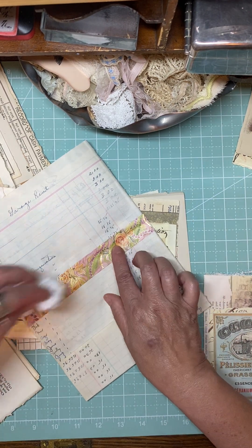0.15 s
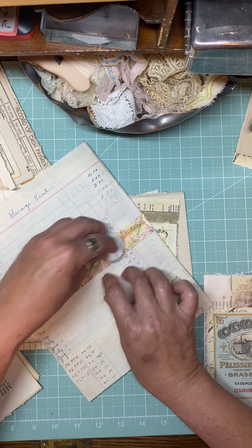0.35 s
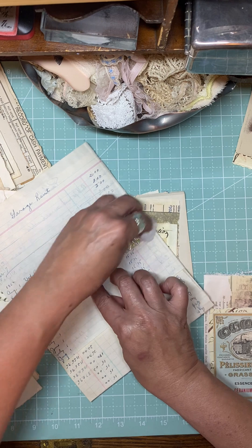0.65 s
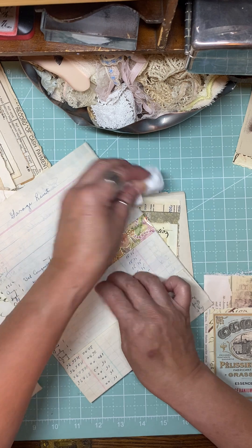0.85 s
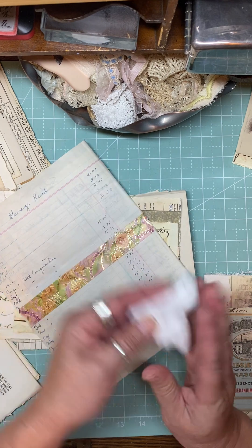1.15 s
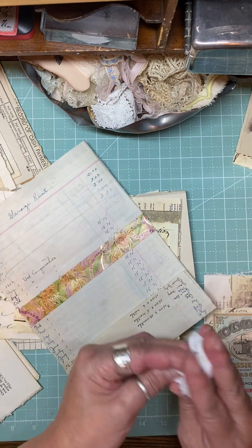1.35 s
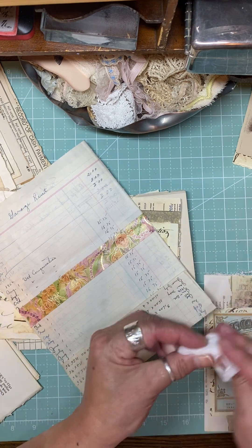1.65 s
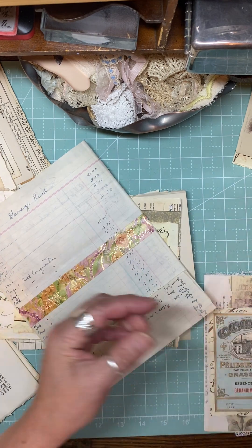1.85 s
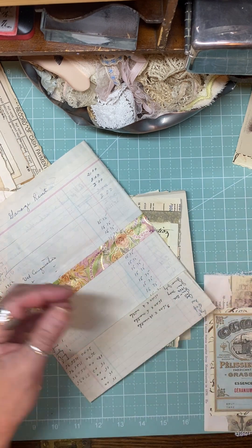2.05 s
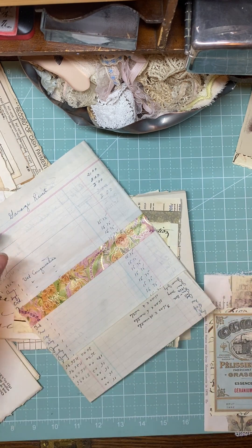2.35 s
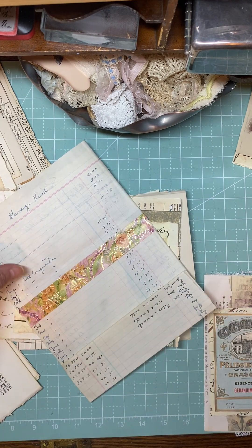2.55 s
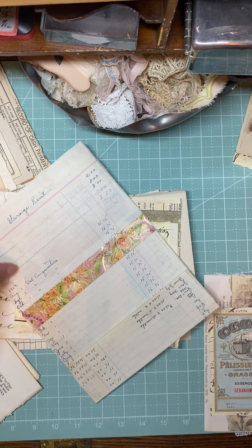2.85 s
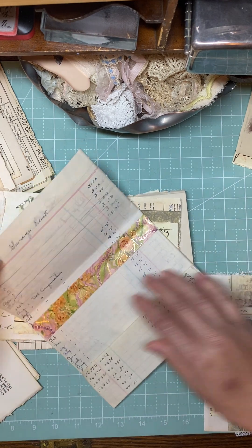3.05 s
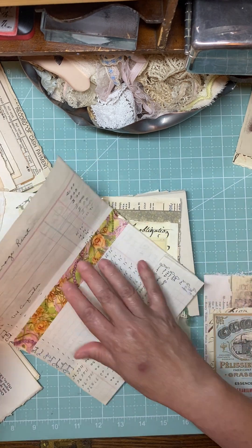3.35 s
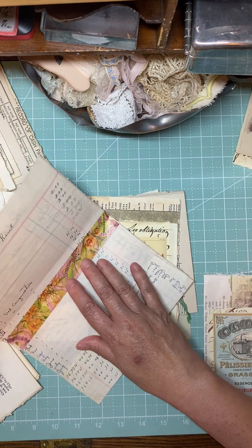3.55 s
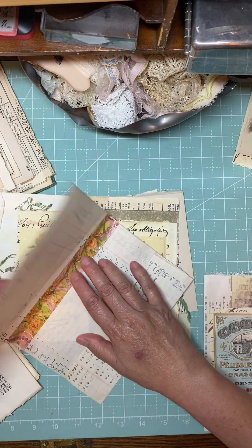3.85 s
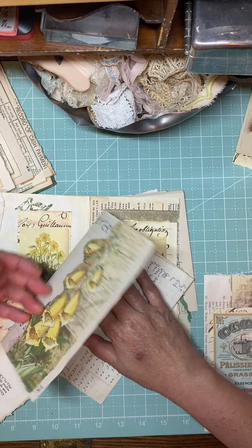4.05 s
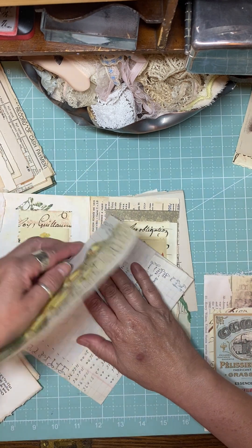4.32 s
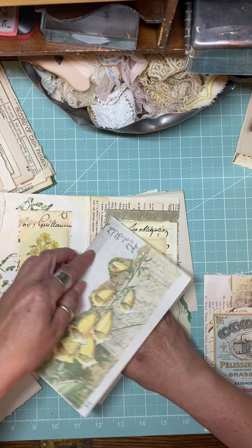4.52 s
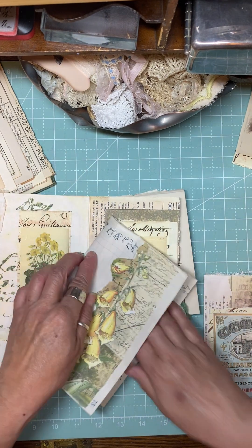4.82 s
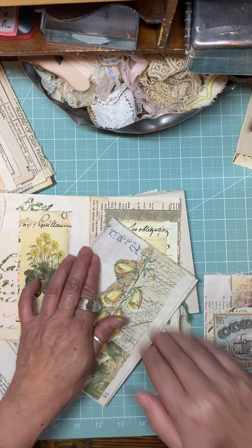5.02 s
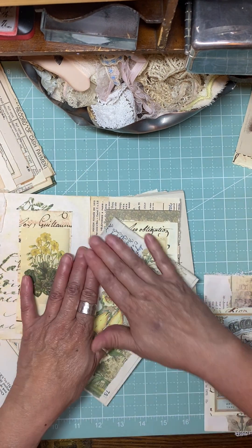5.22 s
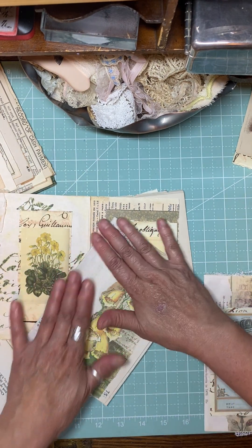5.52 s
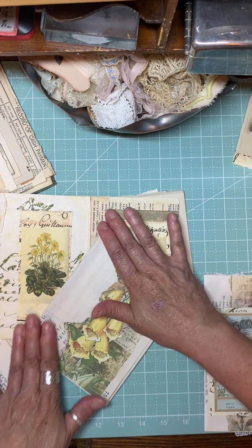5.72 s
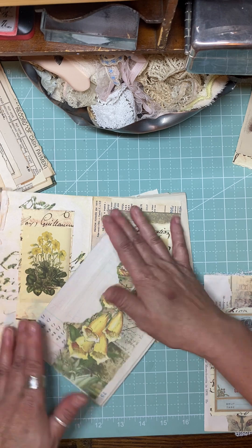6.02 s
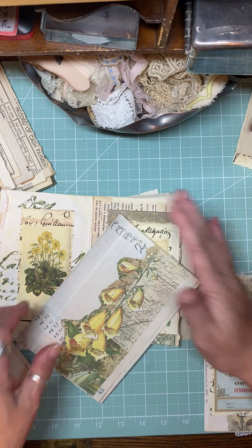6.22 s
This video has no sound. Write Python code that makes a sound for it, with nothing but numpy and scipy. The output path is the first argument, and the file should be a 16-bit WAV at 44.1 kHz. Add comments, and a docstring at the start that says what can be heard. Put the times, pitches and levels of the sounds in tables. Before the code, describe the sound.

Fingers and cloth rub paper in soft raspy strokes, then a sheet is folded over with two loud crisp snaps and smoothed, over a low machine hum.

```python
"""Hands wipe, lift, fold and press sheets of paper on a desk mat, close under a phone with two microphone ports.
Strokes are grainy friction noise, and the loose sheet flaps as duller noise.
Creases and fingertip taps are kicks and crackles that ring sheet and desk; soft contacts and rustles are
noisy pushes, low to bright, that swell and die. Behind them a machine hums: noise in narrow modes of the
small room and two wavering tones, with a broad low rumble of room air that thins out into faint hiss."""
import sys
import numpy as np
from scipy import signal
from scipy.fft import rfft, irfft, next_fast_len
from scipy.io import wavfile
from scipy.ndimage import uniform_filter1d, map_coordinates

SR = 44100
rng = np.random.default_rng(int(sys.argv[2]) if len(sys.argv) > 2 else 0)


def materialize(psi):
    """Save the field psi as 16-bit PCM at rate SR to the path in sys.argv[1].

    A 1-D psi becomes a single channel; in a 2-D psi each row is a channel.
    """
    bounded = np.clip(np.atleast_2d(psi).T, -1, 1)
    quanta = np.round(bounded * 32767).astype(np.int16)
    wavfile.write(sys.argv[1], SR, quanta)


def natural_amplitude(level_db):
    """Convert a level in decibels to a linear amplitude factor, elementwise."""
    exponent = np.asarray(level_db, float) / 20
    return 10 ** exponent


N = 281358  # samples


def unit(x):
    """Scales a signal to rms 1."""
    return x / np.sqrt(np.mean(x ** 2) + 1e-20)


def along(points, hz):
    """Reads a curve of (Hz, value) points on a log frequency axis."""
    f, v = np.transpose(points)
    return np.interp(np.log(hz + 1), np.log(f + 1), v)


def filtered(x, response):
    """Multiplies the spectrum of x by a complex response of frequency."""
    n = x.shape[-1]
    m = next_fast_len(n + 8192)  # room for the ringing
    return irfft(rfft(x, m) * response(np.fft.rfftfreq(m, 1 / SR)), m)[..., :n]


def coloured(x, spectrum):
    """Shapes x by (Hz, dB) points, at rms 1."""
    return unit(filtered(x, lambda hz: natural_amplitude(along(spectrum, hz))))


def modes(table):
    """Causal response of (Hz, width Hz, dB) resonances, added with alternating sign."""
    def response(f):
        total = 0
        for k, (centre, width, db) in enumerate(table):
            damping = 1j * f * width
            total = total + (-1) ** k * natural_amplitude(db) * damping / (centre * centre - f * f + damping)
        return total
    return response


def wobble(rate):
    """A smooth random curve with rate knots a second."""
    return map_coordinates(rng.standard_normal(N // 20), [np.arange(N) * rate / SR])


def grainy(clump_db, patch_db, tick_db, density):
    """Friction noise: clumps of catching fibres, patches of colour, and density small ticks a second."""
    hiss = rng.standard_normal(N) * natural_amplitude(clump_db * (wobble(35) + wobble(220)))
    ticks = (rng.random(N) < density / SR) * rng.laplace(size=N)
    z = signal.stft(unit(hiss) + natural_amplitude(tick_db) * ticks, nperseg=256)[2]
    across_pitch = uniform_filter1d(rng.standard_normal(z.shape), size=3, axis=0)
    patches = unit(uniform_filter1d(across_pitch, size=10, axis=1))
    return signal.istft(z * natural_amplitude(patch_db * patches), nperseg=256)[1][:N]


def touch(rows):
    """Gain of each (s, dB, build-up s, let-go s) row over time, one line a row, at every 32nd sample."""
    s, db, rise, fall = np.transpose(rows)[:4, :, None]
    t = np.arange(0, N + 32, 32) / SR - s
    # share of the build-up or let-go away from the firmest touch
    u = np.clip(np.where(t < 0, -t / np.abs(rise), t / np.abs(fall)), 0, 1)
    return natural_amplitude(db) * (1 - u ** 1.067) ** 1.554


def together(gains):
    """Adds the rows in power and gives one value per sample."""
    total = np.sqrt((gains ** 2).sum(axis=0))
    return np.interp(np.arange(N) / 32, np.arange(gains.shape[1]), total)


def diffuse(two):
    """Turns two unrelated signals into sound from all sides, as alike at the two ports as the table says."""
    # left-right likeness at the two ports: pitch_hz, likeness (1 same, -1 opposite)
    likeness = [(60, .997), (100, .995), (160, .965), (290, .75), (640, 0), (1500, .4), (4000, .2),
                (7000, .2), (10000, -.4), (12500, -.9), (14000, -.98)]

    def mid_side(hz):
        turn = np.arccos(along(likeness, hz)) / 2
        return np.array([np.cos(turn), np.sin(turn)])

    mid, side = filtered(two, mid_side)
    return np.array([mid + side, mid - side])


def strokes():
    """Skin and cloth slide on paper: a rub, a fine hiss from the same fibres, small creases, and the flapping sheet."""
    # slides over the paper: firmest_touch_s, rub_db, build_up_s, let_go_s, fine_hiss_over_rub_db
    slides = [ (0.0, -64, .05, 0.14, 2.5), (.073, -63.5, 0.02, 0.074, 2), (.155, -72.5, 0.059, 0.2, -2),
              (0.242, -63.5, 0.013, 0.017, -24), (.35, -67, 0.15, 0.076, 0.5), (.4, -62, 0.13, 0.047, 4),
              (.445, -63, 0.064, 0.16, 3), (.535, -63.5, 0.13, .03, 3.5), (.572, -58, 0.042, 0.12, 3),
              (.64, -66, 0.12, 0.096, 8.5), (.69, -62, 0.031, 0.21, 6.5), (.785, -61, 0.23, 0.079, 5.5),
              (.85, -61, .04, 0.041, 2), (.898, -73, 0.021, 0.067, 3), (1.02, -71.5, 0.4, 0.27, -9),
              (1.214, -79, .07, 0.18, 5), (1.392, -79, 0.13, 0.061, 2), (1.565, -78, 0.082, 0.18, 6.5),
              (1.698, -74.5, 0.056, 0.027, 4), (1.872, -76, 0.097, 0.059, 5),
              (1.968, -73.5, 0.1, 0.033, -0.5), (2.1, -76.5, 0.056, 0.11, 10.5), (2.19, -86, .07, 0.084, 6),
              (2.667, -76.5, 0.013, 0.056, 8), (2.724, -66, 0.037, 0.063, 4.5),
              (2.776, -56, 0.023, 0.056, 4.5), (2.84, -65, 0.054, 0.041, 6), (2.906, -57, 0.065, .3, 4.5),
              (3.18, -63, 0.34, 0.11, -4.5), (3.224, -59.5, 0.14, 0.025, 4.5),
              (3.31, -62.5, 0.12, .065, 3.5), (3.39, -80.5, 0.038, 0.067, -4),
              (3.462, -51.5, 0.049, 0.11, -2.5), (3.52, -56, 0.12, 0.11, 3), (3.62, -85, .05, 0.088, 3),
              (3.771, -73.5, 0.14, 0.087, 3), (3.807, -55, 0.01, 0.049, -11),
              (3.925, -54, 0.067, 0.035, -2.5), (3.99, -70, 0.072, .07, -0.5),
              (4.053, -71.5, 0.24, .05, -8), (4.16, -69.5, 0.013, 0.1, 4.5), (4.25, -67, 0.11, 0.15, 4),
              (4.332, -55, 0.091, 0.055, -8), (4.388, -72, 0.072, 0.031, 3.5),
              (4.434, -69, 0.086, 0.13, -9), (4.569, -61.5, 0.097, 0.044, -4), (4.705, -53, 0.15, 0.01, -1),
              (4.75, -49.5, 0.059, 0.12, 0.5), (4.8, -51, 0.063, 0.028, -9),
              (4.825, -48.5, 0.018, .09, -2.5), (4.892, -46, 0.13, 0.068, -6.5),
              (4.998, -63, 0.09, 0.033, 0), (5.069, -59.5, 0.1, 0.12, -2.5), (5.2, -70, 0.079, 0.18, -3.5),
              (5.26, -61, 0.022, 0.032, 5), (5.293, -60.5, 0.06, .04, 6.5), (5.35, -74, 0.069, 0.046, 5.5),
              (5.451, -58, 0.094, 0.36, 5), (5.6, -56.5, 0.24, 0.27, 8), (5.75, -61.5, 0.23, .11, 4.5),
              (5.89, -75, 0.023, 0.047, -4.5), (5.932, -70.5, 0.062, 0.045, -2.5),
              (6.032, -61.5, 0.087, 0.1, 0.5), (6.078, -64.5, 0.083, 0.072, 4.5),
              (6.18, -87, 0.086, 0.088, 0), (6.32, -77.5, .14, 0.089, -10)]
    # the loose sheet flaps: firmest_s, level_db, build_up_s, let_go_s
    sheet_flaps = [(.108, -67.5, 0.075, 0.047), (.245, -65, 0.044, 0.095), (.55, -64.5, 0.24, 0.15),
                   (.82, -64.5, 0.17, 0.18), (.898, -67, 0.034, .025), (1.1, -91, .06, .08),
                   (2.46, -79, .04, 0.031), (2.76, -68, 0.061, 0.047), (3.226, -54.5, 0.026, 0.023),
                   (3.418, -70, .02, 0.044), (3.488, -64, 0.029, 0.053), (3.85, -71, 0.047, 0.073),
                   (3.946, -53.5, 0.073, 0.05), (4.054, -64, 0.11, 0.027), (4.105, -66, 0.033, .06),
                   (4.332, -54.5, .12, 0.081), (4.434, -66, 0.062, 0.027), (4.62, -57.5, 0.065, 0.19),
                   (4.81, -55, 0.054, 0.043), (4.9, -57.5, 0.058, 0.21), (5.13, -65, .15, .12),
                   (6.25, -73, .12, .15)]
    # colours of rub, fine hiss and flapping: pitch_hz, level_db
    rub_colour = [(500, -120), (900, -10.5), (1350, 3), (1800, 2.5), (2600, 5.5), (3600, 4), (4800, -1),
                  (6000, -10.5), (9000, -40.5), (12000, -120)]
    fibre_colour = [(2500, -120), (4000, -5.5), (4800, -3), (6000, 2.5), (8000, 2.5), (10500, 2),
                    (13000, 0), (15700, 2), (16100, -60.5)]
    flap_colour = [(150, -120), (300, -0.5), (600, -4.5), (900, -3.5), (1500, -16), (2500, -120)]
    # where small creases in the sliding sheet ring: pitch_hz, width_hz, level_db
    crease_modes = [(1350, 260, 1.5), (2300, 490, -7.5)]

    gains = touch(slides)
    hiss_db = np.transpose(slides)[4][:, None]
    drag = gains * natural_amplitude(-15 - .5 * hiss_db)  # a stroke shakes the sheet; hissing strokes shake it less
    shaken = np.vstack([drag, touch(sheet_flaps)])

    fibres = grainy(clump_db=1.4, patch_db=1.0, tick_db=9.0, density=260)
    creases = (rng.random(N) < 110 / SR) * rng.laplace(size=N)  # about 110 a second
    grit = natural_amplitude(-13.5) * unit(filtered(creases, modes(crease_modes)))
    rub = together(gains) * (coloured(fibres, rub_colour) + grit)
    hiss = together(gains * natural_amplitude(hiss_db)) * coloured(fibres, fibre_colour)
    flutter = grainy(clump_db=1.8, patch_db=2.5, tick_db=6, density=150)
    return rub + hiss + together(shaken) * coloured(flutter, flap_colour)


def pair(response):
    """Diffuse noise of rms 1 through a response."""
    return unit(diffuse(filtered(rng.standard_normal((2, N)), response)))


def hum():
    """Machine noise fills narrow room modes, with two slowly wavering tones and a low air rumble thinning into hiss."""
    # hum resonances of the room: pitch_hz, width_hz (of each of two passes), rms_db
    room_modes = [(86, 6.8, -64.5), (101.8, 10, -66), (119.03, 6, -59), (143.2, 12, -62.5),
                  (172, 14, -72.5), (206.3, 5.6, -71), (242.45, 8, -66), (255.1, 11, -68), (349.9, 22, -69),
                  (389.3, 6.3, -73.5), (496.8, 24, -76.5)]
    # machine tones: pitch_hz, level_db, wavering_db
    machine_tones = [(35.5, -62, -0.6), (57.6, -56, 4)]
    # colour of the room air: pitch_hz, level_db
    air_colour = [(28, -32.5), (40, -9.5), (64, -7), (133, -12), (190, -19.5), (300, -20.5), (430, -25.5),
                  (520, -29.5), (700, -39.5), (1000, -44.5), (1500, -53), (2500, -52.5), (5800, -56.5),
                  (15800, -65)]

    sound = natural_amplitude(-58.5) * pair(lambda hz: natural_amplitude(along(air_colour, hz)))
    turn = 2 * np.pi * np.arange(N) / SR
    for hz, db, waver_db in machine_tones:
        level = natural_amplitude(db + waver_db * wobble(1.5))
        sound = sound + level * np.sqrt(2) * np.sin(hz * turn + .6 * wobble(5))
    for hz, width, db in room_modes:
        sound = sound + natural_amplitude(db) * pair(lambda f: modes([(hz, width, 0)])(f) ** 2)
    return sound


def snaps():
    """A buckling crease or tap: one kick and a short crackle ring the sheet, knock the desk and leave a dying rattle."""
    # crease snaps and fingertip taps: start_s, level_db, pitch_hz, then over that level: desk_knock_db, bright_edge_db
    creases = [(.0212, -45.5, 1480, -13, -16), (.039, -54, 1300, -27, -20), (0.072, -40.5, 1280, -21, 3.5),
               (0.1435, -45.5, 4040, -13, -7), (0.243, -36.5, 2060, -17.5, -32),
               (0.3153, -48, 1480, -12, -22), (0.354, -50, 1350, -28, -15), (.386, -47, 1300, -15, -20),
               (0.4054, -28, 2170, -21, -26), (.533, -46, 1350, -20, -20),
               (0.556, -25.5, 1400, -51.5, -3.5), (0.6902, -44, 5570, -36, 5.5),
               (0.8001, -46, 1360, -20, -12), (0.8377, -36, 1290, -40, -14), (.8986, -48, 1300, -20, -18),
               (0.9598, -52.5, 1180, -7.5, -21), (2.752, -52, 1100, -12, -20),
               (2.81, -44.5, 1400, -18, -17), (2.999, -46.5, 1300, -11, -20), (3.2284, -49, 1210, -6, -17),
               (3.267, -47.5, 1220, -9, -7), (3.4212, -51, 1090, -6, -22), (3.455, -45.5, 1250, -20, -15),
               (3.483, -38.5, 1100, -19, -15), (3.515, -39.5, 2140, -30, -19),
               (3.5278, -37, 1900, -27, -22), (3.8072, -41, 1070, -19, -44), (4.267, -49.5, 1480, -18, -9),
               (4.2907, -37, 2110, -18, -4.5), (4.3174, -34.5, 2230, -17, -21),
               (4.332, -31, 1660, -25, -35), (4.5146, -36, 1240, -9.5, -27),
               (4.5195, -27.5, 1240, -33, -37), (4.6311, -28.5, 2370, -27, -23),
               (4.67, -36.5, 1200, -8.5, -6), (4.7123, -6, 2300, -28, -14),
               (4.8087, -5.5, 3120, -14.5, -6.5), (5.247, -46, 1200, -7.5, -13),
               (5.2603, -37, 2040, -22.5, -1), (5.928, -47.5, 2600, -31, -27),
               (5.9747, -52.5, 1766, -19, -12), (6.0354, -43, 2120, -27, -26)]
    # resonances of the desk and of the paper: pitch_hz, width_hz, level_db
    desk_modes = [(520, 87, -0.5), (844, 76, 1), (352, 580, -16)]
    paper_modes = [(1400, 390, 2.5), (1965, 320, 8), (2610, 1900, 6), (3390, 1500, -14.5), (3900, 370, -1),
                   (6700, 1200, -16)]
    # colour of a snap's bright edge: pitch_hz, level_db
    edge_colour = [(3500, -59.5), (5000, -14), (6500, -1), (8000, -6), (10500, 2), (13000, -2),
                   (16500, -7.5), (16900, -62.5)]

    def peak(v):
        """Scales to a peak of 1."""
        return v / np.abs(v).max()

    def thin(f):
        """A small sheet radiates little bass."""
        return (1j * f / (1j * f + 500)) ** 2

    out, t = np.zeros(N + SR), np.arange(SR // 8) / SR
    for s, db, hz, knock_db, edge_db in creases:
        # s; the weaker the knock on the desk, the shorter the crackle
        crackle_t60 = 0.038 * natural_amplitude(0.52 * knock_db)
        crackle, rattle = natural_amplitude(-60 * t / crackle_t60), natural_amplitude(-19.0 - 60 * t / .05)
        burst = (crackle + rattle) * (1 - np.exp(-t / 0.0011))
        # the harder the snap, the cleaner its first kick
        kick = natural_amplitude(0.02 * db + 9.5) * np.exp(-((t - .0008) / .00004) ** 2)
        force = burst * rng.standard_normal((2, len(t))) - kick
        buckle = filtered(force[0], lambda f: modes([(hz, .45 * hz, 0)])(f) ** 2)
        # harder snaps shake more of the sheet
        sheet = natural_amplitude(0.28 * db + 1) * filtered(force[0], modes(paper_modes))
        edge = filtered(force[1], lambda f: natural_amplitude(along(edge_colour, f)))
        knock = filtered(force[0], lambda f: modes(desk_modes)(f) * thin(f))
        snap = peak(filtered(buckle + sheet, thin))
        snap = snap + natural_amplitude(edge_db) * peak(edge) + natural_amplitude(knock_db) * peak(knock)
        out[round(s * SR):][:len(t)] += natural_amplitude(db) * snap
    return out[:N]


def thumps():
    """Soft contacts and rustles: a noisy push around one pitch, low to bright, that swells and dies."""
    # contacts with the mat and rustles of the sheet: start_s, level_db (before swell and decay), pitch_hz, rise_s, t60_s
    contacts = [(.9, -66, 2500, 0.13, 0.93), (.096, -55, 750, .004, 0.05),
                (2.194, -53.5, 460, 0.0037, 0.043), (2.217, -47, 370, .003, 0.034),
                (2.275, -69, 840, .005, 0.054), (2.421, -68, 2470, .004, .07),
                (2.452, -68.5, 2450, .004, 0.075), (2.708, -58, 1350, 0.0091, 0.14),
                (2.781, -58, 1400, .02, 0.22), (2.89, -59.5, 1300, 0.046, 0.59),
                (3.924, -34.5, 320, 0.012, 0.1), (4.04, -56, 2000, 0.0037, 0.041),
                (4.154, -60.5, 1420, 0.0044, 0.13), (4.232, -53, 1460, .004, 0.075),
                (4.623, -40.5, 1200, 0.004, 0.068), (4.515, -38, 2300, 0.0028, 0.074),
                (3.97, -46, 610, 0.014, 0.091), (4.03, -49, 700, 0.0098, 0.078),
                (4.09, -58, 740, 0.018, 0.24), (4.29, -44, 495, 0.0082, 0.14),
                (4.326, -35, 605, 0.008, 0.052), (4.336, -38.5, 1320, .003, 0.031),
                (4.409, -46, 600, 0.018, 0.076), (4.516, -32.5, 520, 0.0044, 0.046),
                (4.534, -35.5, 600, 0.0028, 0.051), (4.675, -50, 630, 0.0033, 0.32),
                (4.863, -32, 1310, 0.042, 0.14), (4.885, -42, 2500, .012, 0.065),
                (4.893, -27.5, 4080, 0.0078, 0.042), (4.93, -45, 1500, 0.014, 0.17),
                (3.804, -46, 1150, 0.0024, 0.054), (3.805, -47, 2600, 0.0022, 0.045),
                (5.085, -58, 825, 0.016, .15), (6.26, -71, 2200, 0.03, 0.26)]
    out, t = np.zeros(N + SR), np.arange(SR // 2) / SR
    for s, db, hz, rise, t60 in contacts:
        width = .75 * hz if hz < 1000 else .35 * hz
        noise = rng.standard_normal(len(t))
        push = unit(filtered(noise, lambda f: modes([(hz, width, 0)])(f) ** 2))
        out[round(s * SR):][:len(t)] += natural_amplitude(db - 60 * t / t60) * (1 - np.exp(-t / rise)) * push
    return out[:N]


def ports(x):
    """The two ports hear the desk with a phase and level gap that depends on frequency."""
    # gaps between the ports: pitch_hz, left_lead_rad; and pitch_hz, left_over_right_db
    port_lead = [(0, 0), (430, 0), (900, -.6), (1290, -.1), (1890, .2), (2330, .7), (2840, 1.2), (3300, 1),
                 (3700, .7), (4300, 1.5), (4600, 2.1), (4820, 3.2), (5000, 4.6), (5300, 6.4), (5770, 6.9),
                 (7750, 7.8), (10900, 8.5), (12300, 8.85), (13300, 9.15), (22050, 9.2)]
    port_gap = [(150, 0), (350, 6.5), (800, 2.5), (1500, -1), (3000, -1.5), (5500, -0.3), (9000, 0.2)]
    half = np.array([[.5], [-.5]])  # each port takes half of the gap

    def response(hz):
        lead = np.interp(hz, *np.transpose(port_lead))
        return natural_amplitude(half * along(port_gap, hz)) * np.exp(1j * half * lead)

    return filtered(x, response)


def room(x):
    """The small room answers with noise in which each frequency dies at its own speed."""
    # decay of the room: pitch_hz, t60_s
    decay = [(300, 0.13), (2000, 0.065), (10000, 0.017)]
    hz, t, z = signal.stft(rng.standard_normal((2, SR // 3)), SR, nperseg=256)
    tail = signal.istft(z * natural_amplitude(-60 * t / along(decay, hz)[:, None]), SR, nperseg=256)[1]
    late = np.pad(x, (130, 0))[None]  # the answer starts 130 samples after the direct sound
    return signal.fftconvolve(late, tail / np.linalg.norm(tail[0]), axes=1)[:, :N]


def scene():
    """Paper on the desk, heard directly and from the walls, over the hum."""
    paper = strokes() + snaps() + thumps()
    return ports(paper) + natural_amplitude(-11.0) * diffuse(room(paper)) + hum()


def roll_off(x):
    """The treble ends steeply here."""
    return signal.sosfilt(signal.butter(12, 16800, fs=SR, output="sos"), x)


def record(dry):
    """The microphone drops the deepest bass."""
    bass_cut = [(22, -50), (31, 0)]  # pitch_hz, level_db
    mix = filtered(dry, lambda hz: natural_amplitude(along(bass_cut, hz)))
    return roll_off(mix)


dry = scene()
out = record(dry)
materialize(out)
```